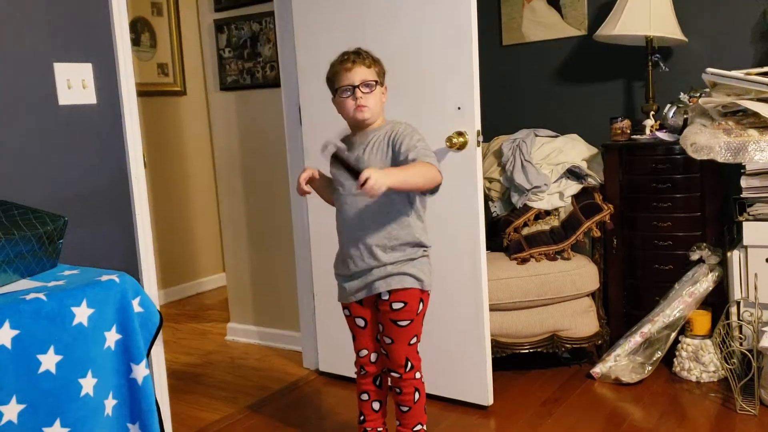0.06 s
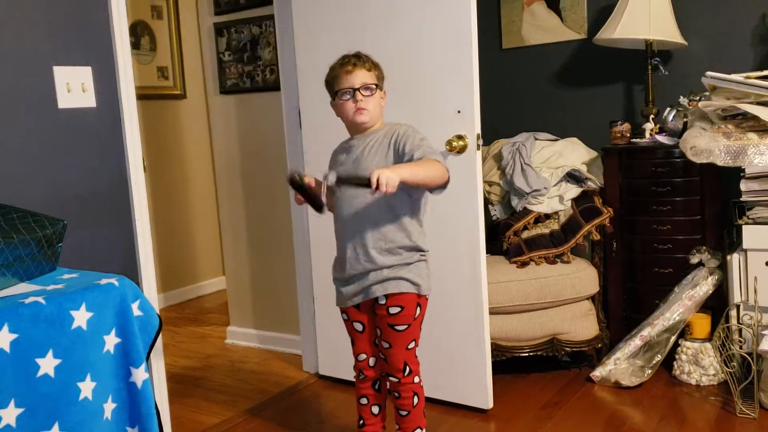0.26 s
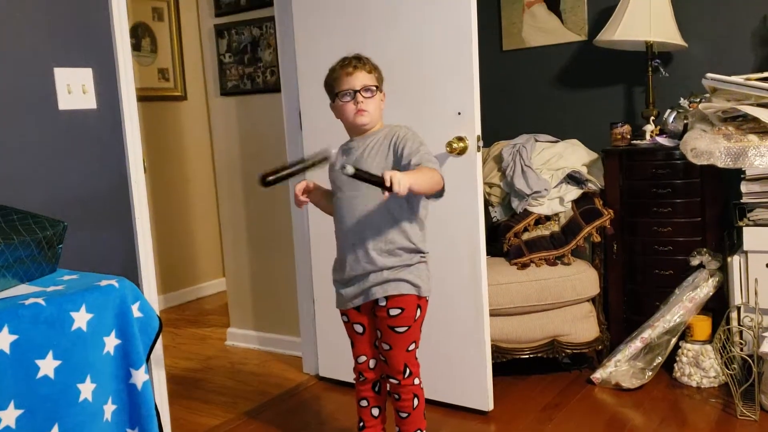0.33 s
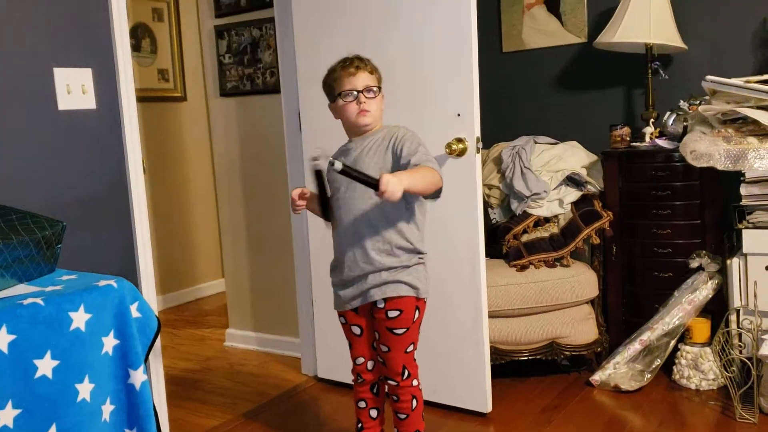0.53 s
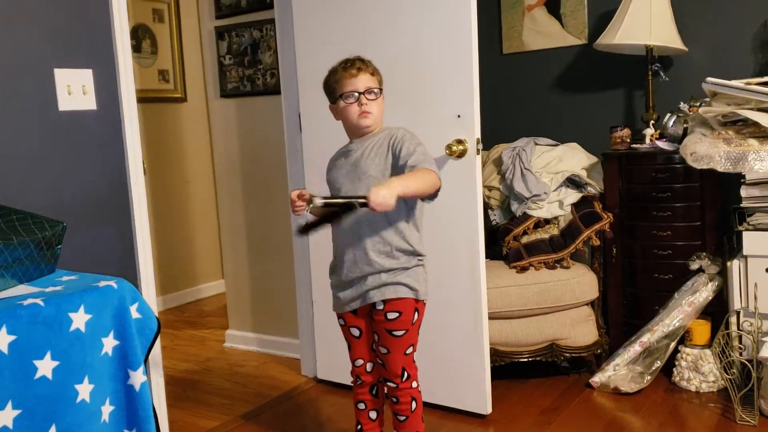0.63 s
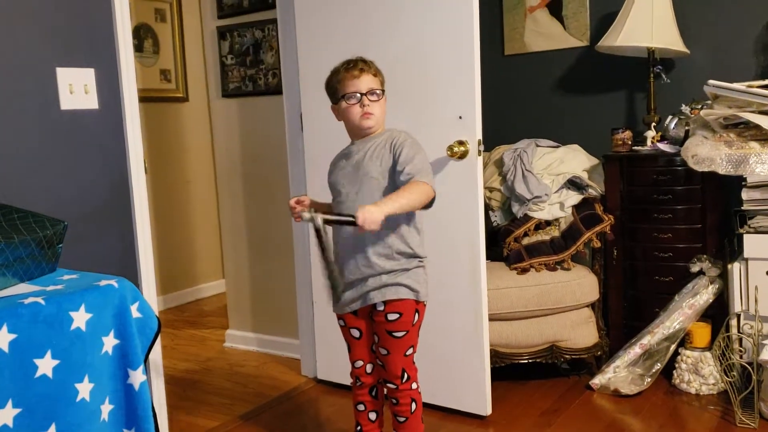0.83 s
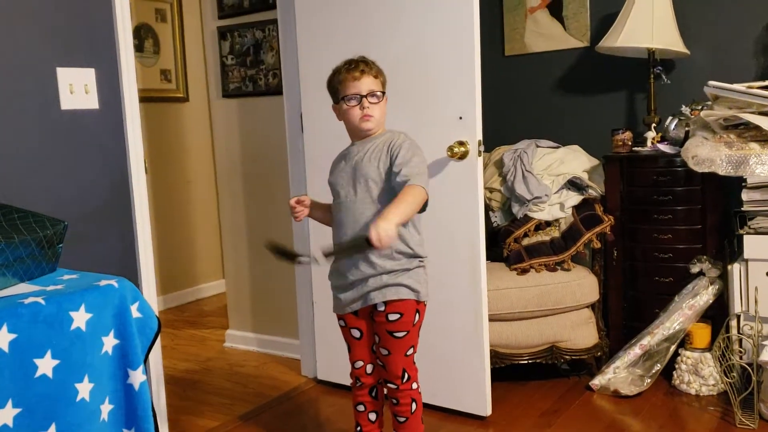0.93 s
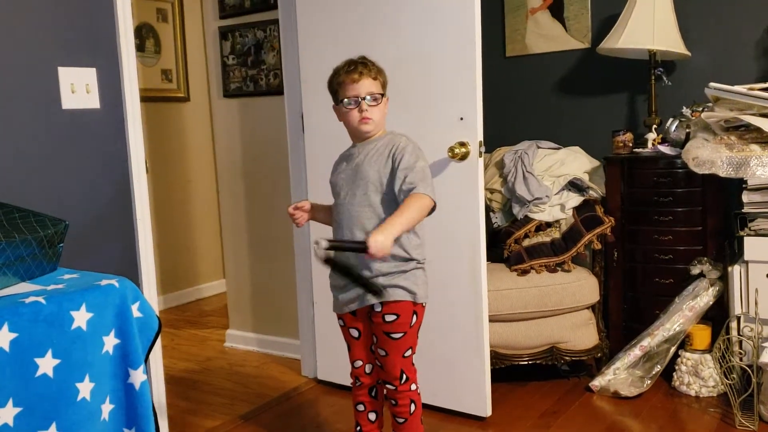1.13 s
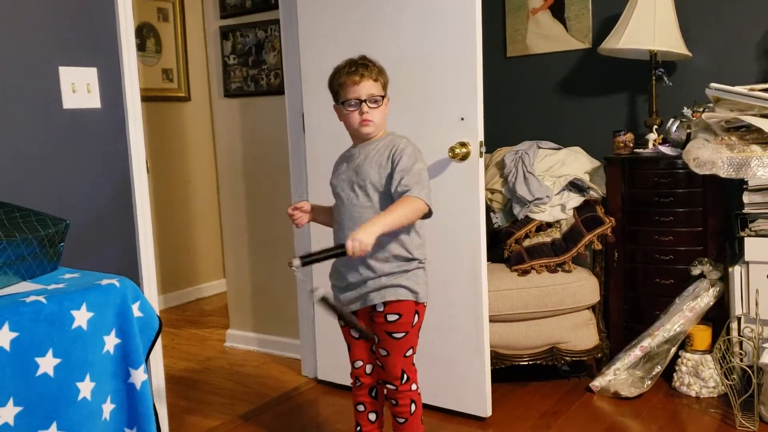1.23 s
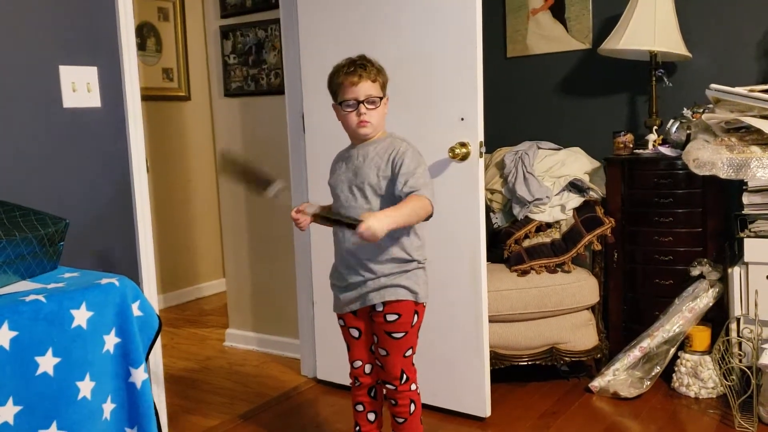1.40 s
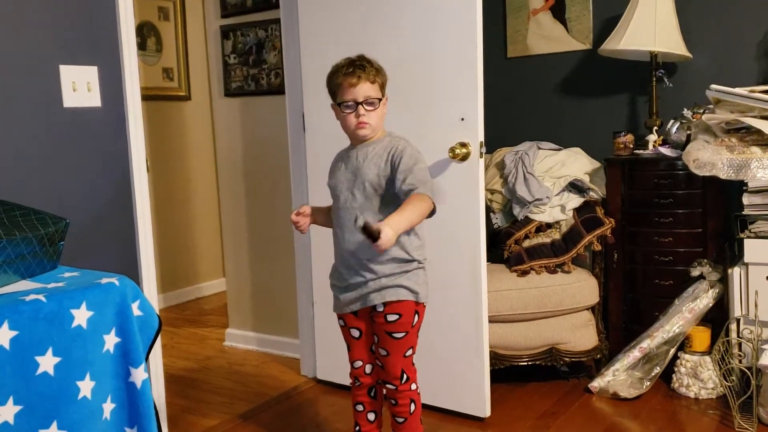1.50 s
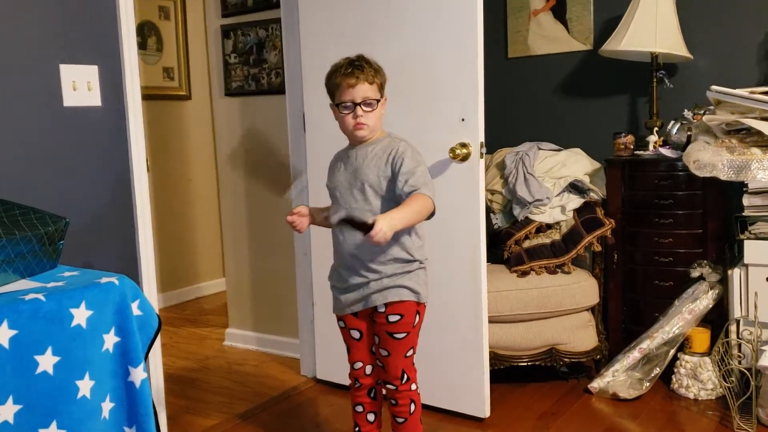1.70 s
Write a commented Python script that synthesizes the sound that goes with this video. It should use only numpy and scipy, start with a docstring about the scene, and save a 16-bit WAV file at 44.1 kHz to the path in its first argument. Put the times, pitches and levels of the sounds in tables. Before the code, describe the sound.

Nunchucks swing with sharp chain clatters and briefly ringing handle knocks in a small room.

```python
"""Sharp clatters of nunchucks, swung in a small, live room a few steps from a stereo microphone pair.
Each time the chain snaps taut or goes slack, its steel links clack and knock the two hard handles,
which ring briefly. Loose links jingle faintly between the snaps and the moving player makes a few
soft thuds. Behind it all lies the room tone, a steady hiss with a fan-like hum."""
import sys
import numpy as np
from scipy import signal
from scipy.fft import rfft, irfft, next_fast_len
from scipy.io import wavfile

SR = 44100
rng = np.random.default_rng(int(sys.argv[2]) if len(sys.argv) > 2 else 0)


def put_to_file(sound):
    """Save the sound as 16-bit audio at rate SR, in the file named by the first command-line argument."""
    columns = np.atleast_2d(sound).T  # one column per channel
    safe = np.clip(columns, -1, 1)
    whole_steps = np.round(safe * 32767)
    wavfile.write(sys.argv[1], SR, whole_steps.astype(np.int16))


N = 77175

# Steady hiss of the room: freq_hz, level_db
HISS_SPECTRUM = [(20, -7.5), (45, -5.5), (105, -4), (170, -5), (250, -13), (400, -2.5), (600, -12),
                 (1000, -10), (2000, -9.5), (2600, -2.5), (3500, -9), (5000, -5), (9000, -21.5),
                 (16000, -20)]
# Decay of the room's tail: freq_hz, t60_s
ROOM_DECAY = [(150, 0.48), (1000, 0.39), (2500, 0.39), (5000, 0.38), (9000, 0.35), (15000, 0.19)]
# Likeness of diffuse sound at the two microphones: freq_hz, correlation
DIFFUSE_LIKENESS = [(50, 0.93), (150, 0.59), (300, 0.93), (700, 0.54), (2000, 0.034), (5000, 0.07),
                    (15000, -0.0076)]
# Direct sound against the room: freq_hz, level_db
DIRECT_SPECTRUM = [(1000, -6), (4500, -3.5), (8000, -2), (14000, -12)]
# Stereo position of the direct sound: freq_hz, left_minus_right_db
DIRECT_BALANCE = [(500, -0.5), (2000, -4), (4500, -4.5), (6500, -7), (9000, 11), (15000, 12.5)]
# Unequal colour of the microphones: freq_hz, left_minus_right_db
MIC_BALANCE = [(50, 1), (120, -2.5), (280, 0.5), (550, -0.5), (1000, 0.5), (2200, 1), (4400, -3),
               (6300, -2), (8300, 2), (15000, 4)]
# The player's shifts of weight: start_s, level_db
THUD_EVENTS = [(.335, -53.5), (0.373, -51), (0.428, -54.5), (.61, -61)]
# Low body of a thud: freq_hz, level_db
THUD_SPECTRUM = [(25, -22), (65, -1), (105, 4.5), (200, -7.5), (400, -17.5), (1500, -68)]
# Clack of link on link: freq_hz, level_db
CLACK_SPECTRUM = [(100, -68.5), (500, -27.5), (1400, -29.5), (2300, -11.5), (3000, -2), (3800, -2),
                  (4900, 2), (5700, -2), (6300, -2.5), (7000, -8.5), (7700, -8), (9000, -19.5),
                  (16000, -21)]
# Bright tick of the links: freq_hz, level_db
TICK_SPECTRUM = [(300, -34.5), (1500, -40), (5000, -3.5), (7700, 0.5), (9200, -7.5), (10500, -2),
                 (12200, 2.5), (14000, -2), (15600, -0.5)]
# Dull knock on a handle: freq_hz, level_db
KNOCK_SPECTRUM = [(50, -30), (200, -18), (400, -19.5), (650, -5.5), (900, 3), (1300, -2), (1900, 12.5),
                  (3000, 17), (6000, 8.5), (12000, -51.5)]
# Modes of the handles and their steel fittings: pitch_hz, level_db, t60_s
HANDLE_MODES = [(918, 0, .1), (1952, 0, .06), (2745, -1, .06), (2990, -2, .04), (3190, 1, .06),
                (3435, -4, .045), (3950, -1, .05), (4115, -2, .05), (4260, 0, .06), (4570, -1, .05),
                (4800, -1, .05), (5960, -4, .06), (6185, 0, .055), (7590, -3, .05), (11300, -8, .03),
                (12000, -4, .003), (12400, -3, .004), (13000, -4, .003)]
# Hard contacts that leave the handles ringing: start_s, level_db, centre_hz, spread_octaves
RING_EVENTS = [(.212, -36.5, 2360, 0.29), (0.337, -26, 4680, 0.06), (0.342, -40.5, 920, 0.3),
               (0.442, -46, 6000, 0.15), (0.577, -20.5, 6330, 0.3), (.579, -41.5, 910, 0.47),
               (.647, -21.5, 2000, .1), (0.649, -20, 3250, 0.1), (.655, -38.5, 920, 0.24),
               (0.658, -21, 7120, 0.18), (0.7135, -25, 7260, 0.19), (.954, -26, 4760, 0.17),
               (1.139, -31.5, 920, .25), (1.142, -28, 1950, .15), (1.141, -24, 2720, .07),
               (1.142, -22, 4100, 0.16), (1.141, -24.5, 11200, 0.064), (1.2602, -32.5, 13000, 0.11)]
# Chain snaps: start_s, length_s, clack_db, tick_over_clack_db, knock_over_clack_db,
# knock_tilt_db_per_octave, direct_db (higher as the handles turn toward the microphones)
CLATTER_EVENTS = [(.010, 0.0046, -39.5, -6, -3, -7.5, -9), (0.089, 0.0064, -33, -9.5, -7.5, 0, -3),
                  (0.184, 0.0021, -41, -8, -4.5, 6, -2), (0.21, 0.0048, -29.5, -5.5, -8.5, 3, -6.5),
                  (0.238, 0.017, -31.5, -3.5, -5.5, -5.5, 2.5), (0.3252, 0.0011, -30, -7, -12, 12, 4),
                  (0.3375, 0.0028, -27.5, -1.5, -13, 3, 2), (0.4419, 0.012, -23.5, -5, -7.5, 1, 2.5),
                  (0.451, 0.0092, -27.5, -9, -4, 0, 3.5), (0.517, 0.095, -36.5, -2, -7.5, 0, -10),
                  (0.573, 0.0054, -28.5, -2, -12, 1, -5), (0.605, 0.01, -29.5, -11.5, -8.5, 2.5, -1.5),
                  (0.631, 0.038, -28, -0.5, -4, 2.5, 5), (0.649, 0.001, -20.5, -5.5, -7, 1.5, 2),
                  (.654, 0.005, -19.5, -0.5, -7.5, -0.5, 3), (0.716, 0.0019, -28.5, -2.5, -19.5, 0, 4.5),
                  (0.7395, 0.0021, -26, -7, -6.5, -6, 2.5), (0.788, 0.032, -35, -5.5, -7, 3, 8),
                  (0.904, 0.0066, -44, -10, -2, -7.5, 1), (0.933, 0.026, -36, -3, -10, 4, 3),
                  (0.948, 0.003, -23.5, -22, -5, -2, 0), (.9525, 0.013, -19, -1.5, -9, 1, 3.5),
                  (0.966, 0.028, -25.5, -38, -17, -7.5, 3.5), (1.082, 0.015, -40, 0.5, 2.5, -3.5, 1.5),
                  (1.114, 0.026, -36, -4, -3.5, 4.5, 4), (1.135, 0.0034, -23, -2.5, -16, -4.5, -7),
                  (1.1391, 0.014, -20.5, -1.5, -9, 2, 4), (1.2594, 0.0068, -36, -13, -8, -0.5, 2),
                  (1.366, 0.0096, -50, -18, -4, 5, 1), (1.502, 0.031, -56, -6, -1.5, 5, 5.5),
                  (1.6395, 0.0041, -45.5, -7, -2.5, 1, 1)]


def amp(db):
    """Decibels to gain."""
    return 10 ** (np.asarray(db) / 20)


def unit_rms(x):
    """Scale to rms 1."""
    return x / np.sqrt(np.mean(x ** 2) + 1e-20)


def unit_hit(x):
    """Scale to the energy of 10 ms at rms 1."""
    return x * np.sqrt(.01 * SR / (np.sum(x ** 2) + 1e-20))


def curve_at(points, hz):
    """Read (freq_hz, value) points along a log frequency axis."""
    freqs, values = np.transpose(points)
    return np.interp(np.log(hz + 1), np.log(freqs + 1), values)


def filtered(x, response):
    """Apply a gain given as a function of frequency."""
    n = x.shape[-1]
    size = next_fast_len(n + 8192)
    return irfft(rfft(x, size) * response(np.fft.rfftfreq(size, 1 / SR)), size)[..., :n]


def coloured(x, spectrum, size=4096):
    """Apply a causal, minimum-phase filter with the given spectrum."""
    cepstrum = irfft(np.log(amp(curve_at(spectrum, np.fft.rfftfreq(size, 1 / SR)))))
    fold = np.r_[1, np.full(size // 2 - 1, 2), 1, np.zeros(size // 2 - 1)]
    impulse = irfft(np.exp(rfft(cepstrum * fold)))
    return signal.fftconvolve(x, impulse)[:len(x)]


def panned(x, balance):
    """Set the left-right level difference by frequency."""
    return filtered(x, lambda hz: amp(np.outer([.5, -.5], curve_at(balance, hz))))


def add(out, start_s, x):
    """Mix x into out from start_s on."""
    i = max(0, round(start_s * SR))
    out[..., i:i + x.shape[-1]] += x[..., :N - i]


def diffuse_noise(n):
    """Noise from all sides: alike at both microphones in the bass, unrelated in the treble."""
    def mid_side_gains(hz):
        angle = np.arccos(np.clip(curve_at(DIFFUSE_LIKENESS, hz), -1, 1)) / 2
        return np.array([np.cos(angle), np.sin(angle)])
    mid, side = filtered(rng.standard_normal((2, n)), mid_side_gains)
    return np.array([mid + side, mid - side])


def in_room(x, direct_db=0, tail_db=1, walls_db=-1, walls_decay_s=.017, right_lag_s=.00004):
    """A source a few steps off: direct sound, wall reflections and a tail, new for each position."""
    def direct_path(hz):
        lag = np.exp(np.outer([1, -1], 1j * np.pi * hz * right_lag_s))
        return amp(direct_db + curve_at(DIRECT_SPECTRUM, hz)) * lag
    n = SR // 2
    band_hz, frame_s, bands = signal.stft(diffuse_noise(n), SR, nperseg=256)
    decay = amp(-60 * frame_s / curve_at(ROOM_DECAY, band_hz)[:, None])
    tail = signal.istft(bands * decay, SR, nperseg=256)[1][:, :n]
    t = np.arange(n) / SR
    walls = diffuse_noise(n) * (rng.random(n) < .04) * np.exp(-t / walls_decay_s)  # sparse echoes
    room = sum(amp(db) * h * np.sqrt(2 / np.sum(h ** 2)) for db, h in [(tail_db, tail), (walls_db, walls)])
    heard = signal.fftconvolve(x[None], room, axes=1)
    heard[:, :len(x)] += filtered(panned(x, DIRECT_BALANCE), direct_path)
    return heard


def room_tone(hiss_db=-54.5, hum_db=-70, hum_hz=352, half_width_hz=16):
    """Steady hiss and a narrow, fan-like hum from all around the microphones."""
    hiss = filtered(diffuse_noise(N), lambda hz: amp(curve_at(HISS_SPECTRUM, hz)))
    hum = filtered(diffuse_noise(N), lambda hz: 1 / (1 + ((hz - hum_hz) / half_width_hz) ** 2))
    return amp(hiss_db) * unit_rms(hiss) + amp(hum_db) * unit_rms(hum)


def player_thuds(decay_s=.005):
    """Soft low bumps as the player shifts weight."""
    out, t = np.zeros((2, N)), np.arange(SR // 5) / SR
    for start_s, level_db in THUD_EVENTS:
        force = rng.standard_normal(len(t)) * np.exp(-t / decay_s)
        thud = unit_hit(coloured(force, THUD_SPECTRUM))
        add(out, start_s, in_room(amp(level_db) * thud))
    return out


def link_jingle(start_s=.24, end_s=1.24, touches_per_s=600, level_db=-56, tick_db=-5, scatter_db=3):
    """Loose links touch at random while the handles fly."""
    t = np.arange(N) / SR
    swinging = (t > start_s) & (t < end_s)
    touching = swinging & (rng.random(N) < touches_per_s / SR)
    force = touching * amp(scatter_db * rng.standard_normal(N))
    clack = unit_rms(coloured(force, CLACK_SPECTRUM))
    tick = unit_rms(coloured(force, TICK_SPECTRUM))
    return amp(level_db) * in_room(unit_rms(clack + amp(tick_db) * tick))[:, :N]


def handle_rings(scatter_db=.5, rise_s=.0008, blur_share=.01):
    """Handles and steel fittings ring; the point of contact picks which of their modes answer."""
    out, t = np.zeros((2, N)), np.arange(SR // 5) / SR
    hz, mode_db, t60_s = np.transpose(HANDLE_MODES)[:, :, None]
    for start_s, level_db, centre_hz, spread_octaves in RING_EVENTS:
        sizes = amp(mode_db + scatter_db * rng.standard_normal(hz.shape))
        sizes /= 1 + (np.log2(hz / centre_hz) / spread_octaves) ** 4
        # The rattling chain blurs each mode by a share of its frequency.
        wander = np.cumsum(rng.standard_normal((len(hz), len(t))), axis=1)
        blur = wander * np.sqrt(2 * np.pi * blur_share * hz / SR)
        phase = 2 * np.pi * (hz * t + rng.random(hz.shape)) + blur
        modes = sizes * amp(-60 * t / t60_s) * np.sin(phase)
        ring = modes.sum(axis=0) * (1 - np.exp(-t / rise_s))
        add(out, start_s, amp(level_db) * unit_hit(in_room(ring, direct_db=7)))
    return out


def link_contacts(length_s, n, count=40, per_s=900, decay_s=.00063, scatter_db=8, first_db=3):
    """A firm first contact and a fading, uneven run of others as link after link pulls tight."""
    times_s = (np.arange(count) + rng.uniform(-.5, .45, count)) / per_s
    sizes = amp(scatter_db * rng.standard_normal(count)) * np.exp(-(times_s / length_s) ** 2)
    times_s[0], sizes[0] = 0, amp(first_db)
    hits = np.bincount((times_s * SR).astype(int), sizes, n)[:n]
    envelope = signal.lfilter([1], [1, -np.exp(-1 / (decay_s * SR))], hits)
    return envelope * rng.standard_normal(n)


def chain_clatters(tilt_above_hz=500):
    """The chain snaps taut or goes slack: its links clack, tick and knock the handles."""
    out = np.zeros((2, N))
    for start_s, length_s, clack_db, tick_db, knock_db, tilt, direct_db in CLATTER_EVENTS:
        force = link_contacts(length_s, SR // 5)
        clack = unit_hit(coloured(force, CLACK_SPECTRUM))
        tick = unit_hit(coloured(force, TICK_SPECTRUM))
        tilted = [(hz, db + tilt * np.log2(max(hz, tilt_above_hz))) for hz, db in KNOCK_SPECTRUM]
        knock = unit_hit(coloured(force, tilted))
        clatter = amp(clack_db) * (clack + amp(tick_db) * tick + amp(knock_db) * knock)
        add(out, start_s, in_room(clatter, direct_db))
    return out


def scene():
    """The nunchucks, their player and the room, heard from the microphone position."""
    return chain_clatters() + handle_rings() + link_jingle() + player_thuds() + room_tone()


def record(dry):
    """Two microphones of unequal colour, with a steep cut at the top of the treble."""
    cutoff_hz = 15800
    return filtered(panned(dry, MIC_BALANCE), lambda hz: 1 / np.sqrt(1 + (hz / cutoff_hz) ** 300))


dry = scene()
out = record(dry)
put_to_file(out)
```